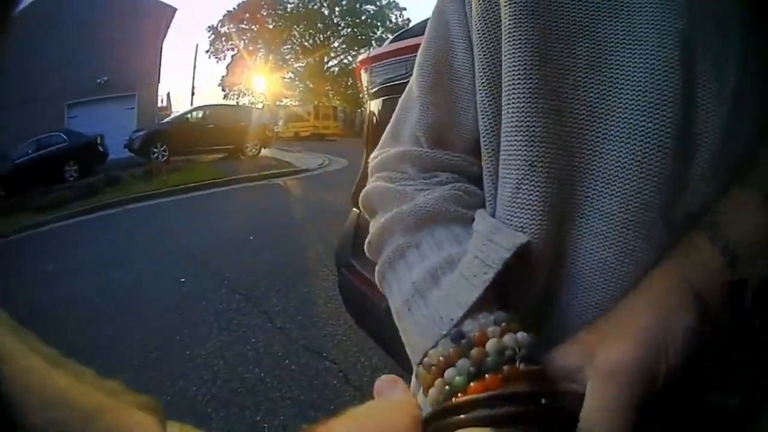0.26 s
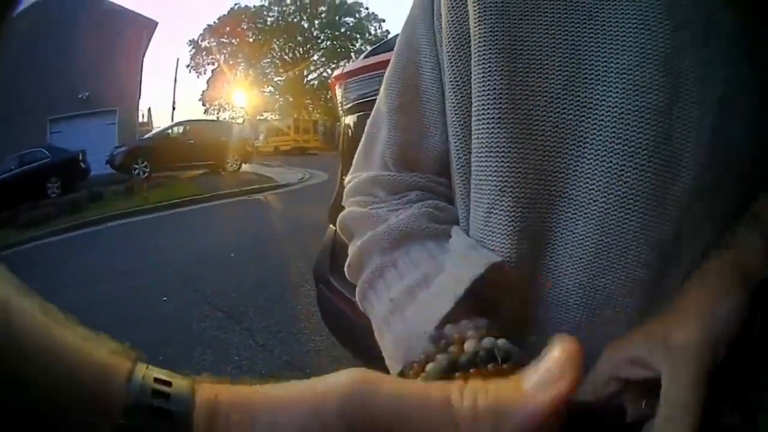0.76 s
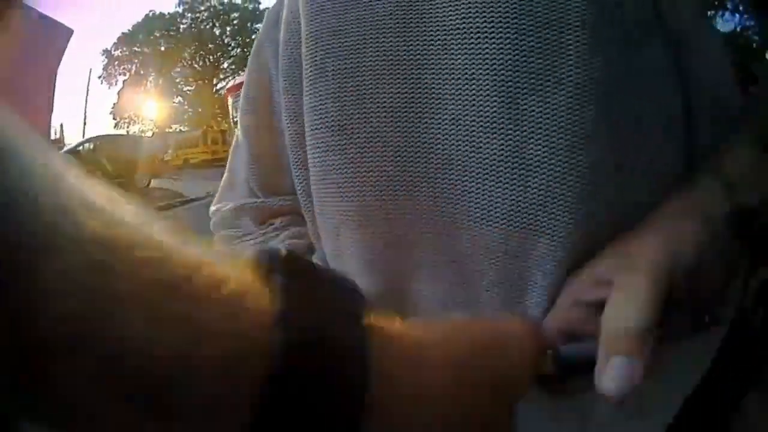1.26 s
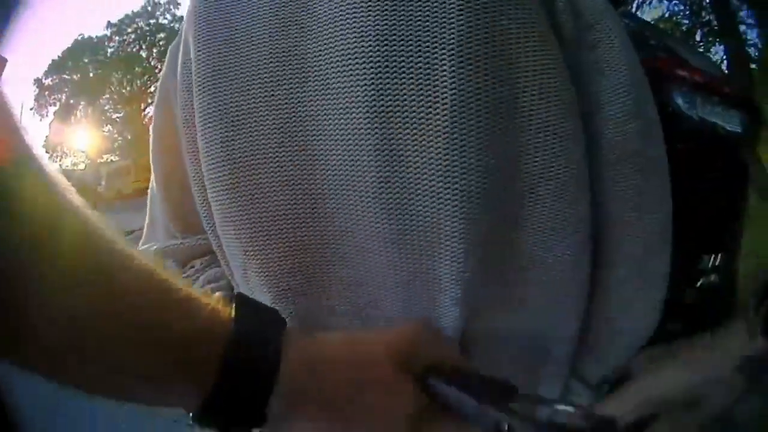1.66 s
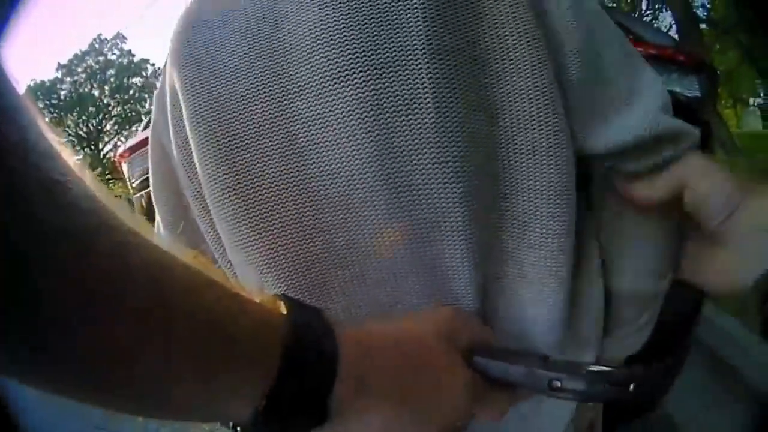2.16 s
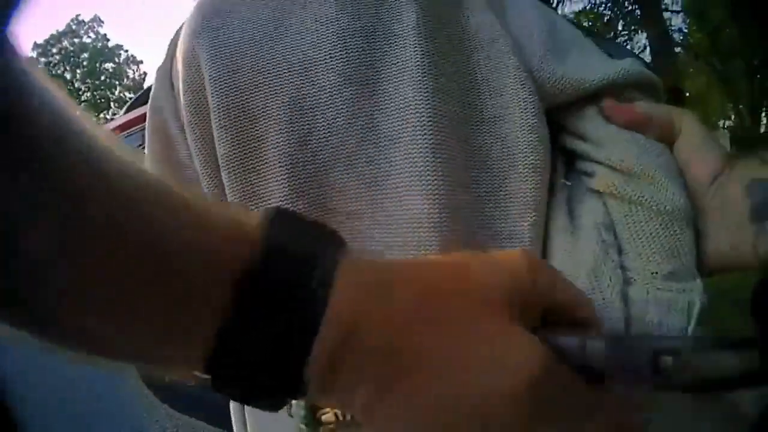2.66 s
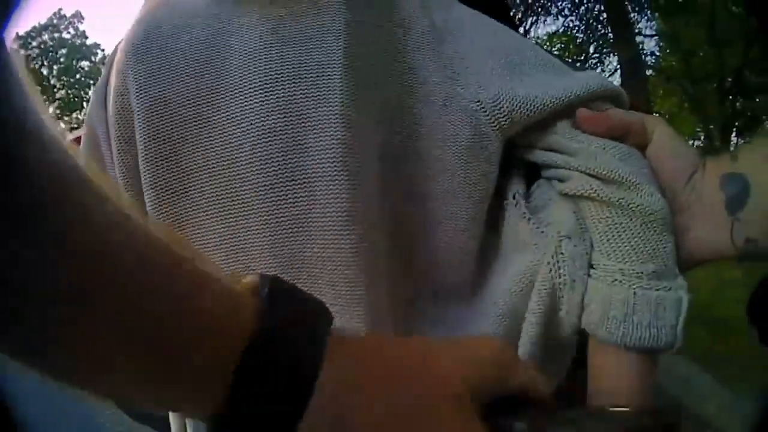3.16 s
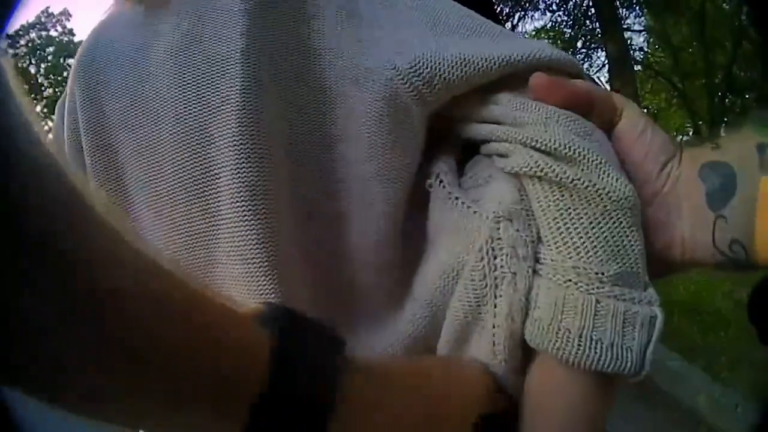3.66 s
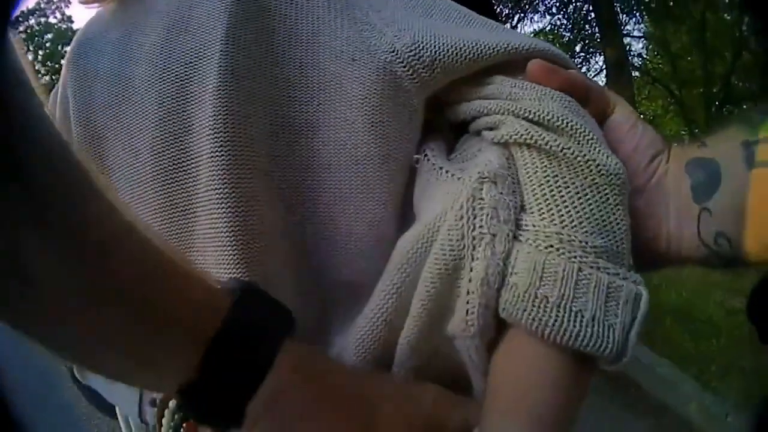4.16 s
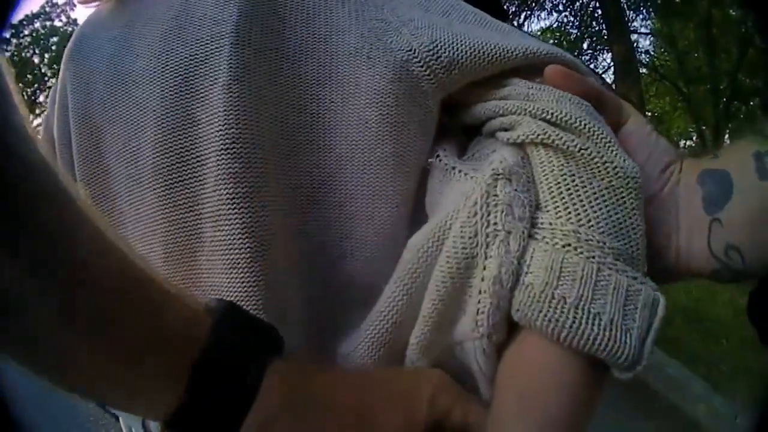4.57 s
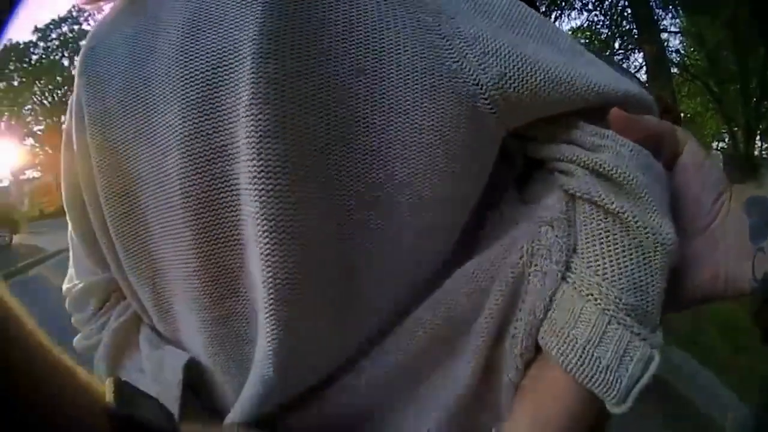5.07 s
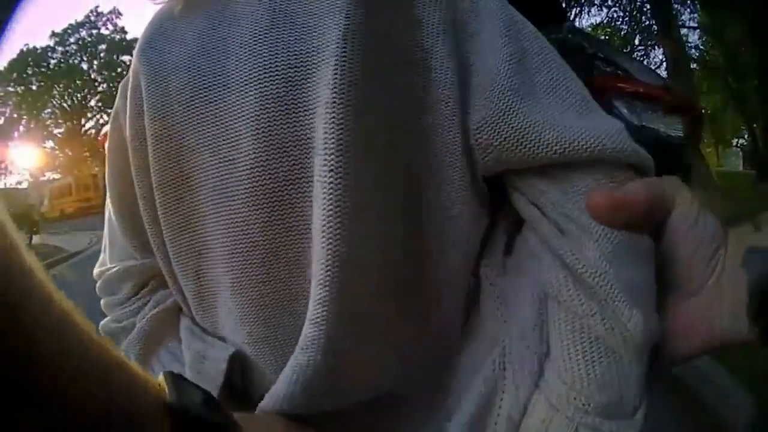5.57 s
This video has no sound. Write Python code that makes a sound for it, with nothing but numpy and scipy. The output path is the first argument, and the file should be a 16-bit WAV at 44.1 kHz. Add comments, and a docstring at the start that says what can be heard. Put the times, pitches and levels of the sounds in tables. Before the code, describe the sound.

Very close, dry body-camera sound outdoors: soft cloth friction, a hollow bump, then crisp steel handcuff teeth snapping in rapid bursts. Two strong clinks follow the last burst, and a heavy clack lands about a second later. Loud steel pushes the murmuring street down and it swells back, with a low drone passing and thin bird chirps near the end.

```python
"""Faint clinks and cloth rustle open a quiet street of murmuring traffic (shaped noise) and shrilling insects
(resonated noise); at 1.4 s a forearm bumps a chest-worn camera, whose case booms in a few modes.
From 2.1 to 3 s steel handcuffs ratchet shut in quick runs: each snap is a contact force ringing steel modes.
Single clinks and dull knocks follow, a hard one at 4.1 s; a gliding sine drone peaks near 4.7 s and a small
bird ticks in falling whistles from 5 s. A limiter makes the street sink at loud sounds and swell back."""
import sys
import numpy as np
from scipy import signal
from scipy.fft import rfft, irfft, next_fast_len
from scipy.io import wavfile
from scipy.ndimage import uniform_filter1d, minimum_filter1d

SR = 44100
rng = np.random.default_rng(int(sys.argv[2]) if len(sys.argv) > 2 else 0)


def dump(signal):
    """Clip the signal to [-1, 1] and save it as 16-bit WAV at the path in sys.argv[1]."""
    limited = np.clip(np.atleast_2d(signal).T, -1, 1)
    pcm = np.round(limited * 32767).astype(np.int16)
    wavfile.write(sys.argv[1], SR, pcm)


N = 256431
TIME = np.arange(N) / SR

# resonances of the steel cuff, the wide ones making the crack: f/Hz, width/Hz, relative level/dB
CUFF_MODES = [(1210, 300, -16), (2160, 160, -12.5), (2846, 150, -10), (3530, 340, 4), (4207, 170, -1),
              (4630, 253, 6.5), (5230, 170, -0.5), (6000, 150, -7), (7270, 900, -4.5), (9520, 290, -5.5),
              (11720, 750, 4), (11370, 1500, -1), (13600, 1350, 0), (17000, 360, 0.5)]
CREEP_S, CHATTER_S = 0.0004, 0.0017  # steel contact: build-up before the snap, chatter after it


def from_db(db):
    """Level to amplitude: 20 dB is a factor of ten."""
    return 10 ** (np.asarray(db) / 20)


def rms_one(x):
    """Normalise the mean power to one."""
    return x / np.sqrt(np.mean(x ** 2) + 1e-20)


def unit_blow(x):
    """Normalise a transient by energy, to that of 4 ms at unit rms."""
    return x / np.sqrt(np.sum(x ** 2) / (0.004 * SR) + 1e-20)


def drift(rate_hz):
    """Low-pass noise: two equal real poles leave a slow random wander of unit rms."""
    step = 40  # samples between computed points
    pole = np.exp(-2 * np.pi * rate_hz * step / SR)
    settle = 2000
    noise = rng.standard_normal(N // step + settle + 2)
    slow = signal.lfilter([1], [1, -2 * pole, pole * pole], noise)[settle:]
    return np.interp(np.arange(N) / step, np.arange(len(slow)), rms_one(slow))


def colour(x, spectrum):
    """Spectral shaping: weight each frequency, level straight over log frequency; unit rms."""
    size = next_fast_len(N)
    hz, level_db = np.transpose(spectrum)
    bins = np.maximum(np.fft.rfftfreq(size, 1 / SR), 1)
    gain = from_db(np.interp(np.log(bins), np.log(hz), level_db))
    return rms_one(irfft(rfft(x, size) * gain, size)[:N])


def resonate(x, hz, width_hz):
    """Damped oscillator: a two-pole resonance with gain near 1 at its peak."""
    r = np.exp(-np.pi * width_hz / SR)
    feed = np.array([1, 0, -1]) * (1 - r * r) / 2
    return signal.lfilter(feed, [1, -2 * r * np.cos(2 * np.pi * hz / SR), r * r], x)


def add(out, s, sound):
    """Linear superposition: mix a sound in at a time."""
    at = min(max(round(s * SR), 0), N)
    out[at:at + len(sound)] += sound[:N - at]


def blows(events, modes, snap, creep_s, chatter_s, tail_db, tail_s, detune, uneven_db):
    """Modal impact: creep, a snap, brief chatter and a fading tail excite modes; grip shifts the middle ones."""
    group_edges_hz = [3900, 8500]  # borders between low, middle and high modes: f/Hz
    nominal_ring_hz = 4650  # an event's ring at this pitch leaves the middle modes unshifted
    lead = 100  # samples of creep ahead of the snap
    out = np.zeros(N)
    t = (np.arange(SR // 8) - lead) / SR
    creep = np.exp(-abs(t) / creep_s)
    chatter = np.exp(-(t / chatter_s) ** 2)
    tail = from_db(tail_db) * np.exp(-abs(t) / tail_s)
    contact = np.where(t < 0, creep, chatter + tail)
    for s, level_db, low_db, high_db, ring_hz in events:
        groups = np.zeros((3, len(t)))
        chances = rng.standard_normal((len(modes), 2))
        for k, ((hz, width_hz, mode_db), (shift, strength)) in enumerate(zip(modes, chances)):
            force = contact * rng.standard_normal(len(t))  # the chatter reaches every mode differently
            force[lead] += snap
            group = np.searchsorted(group_edges_hz, hz)
            grip = ring_hz / nominal_ring_hz if group == 1 else 1
            ring = unit_blow(resonate(force, hz * grip * (1 + detune * shift), width_hz))
            groups[group] += (-1) ** k * from_db(mode_db + uneven_db * strength) * ring
        low, middle, high = map(unit_blow, groups)
        blow = unit_blow(from_db(low_db) * low + middle + from_db(high_db) * high)
        add(out, s - lead / SR, from_db(level_db) * blow)
    return out


def insects(swing_db):
    """Narrow-band noise: twice-resonated noise shrills far off, each band's level wandering slowly."""
    bands = [(2750, 260, -67.5), (3436, 260, -65)]  # evening shrilling: f/Hz, width/Hz of each resonance, mean level/dB
    out = np.zeros(N)
    for hz, width_hz, level_db in bands:
        shrill = resonate(resonate(rng.standard_normal(N), hz, width_hz), hz, width_hz)
        out += from_db(level_db + swing_db * drift(4)) * rms_one(shrill)
    return out


def traffic():
    """Broadband noise with a level curve: far traffic murmurs and swells as a vehicle goes by."""
    level_curve = [(0, -50), (0.13, -45), (0.35, -48.5), (1.7, -46.5), (2.6, -50.5), (3.1, -49.5),
                   (3.4, -44.5), (3.95, -46), (4.6, -36), (4.82, -43.5), (5.1, -42), (5.42, -46),
                   (5.6, -42), (5.8, -44)]  # street level joined by straight lines: t/s, level/dB
    murmur_spectrum = [(40, -8), (100, -8.5), (160, -3), (225, -0.5), (335, -9), (450, -6), (640, -12.5),
                       (850, -10.5), (1050, -16.5), (1250, -14), (1700, -23.5), (4000, -38.5)]  # relative spectrum: f/Hz, level/dB per Hz
    s, level_db = np.transpose(level_curve)
    murmur = colour(rng.standard_normal(N), murmur_spectrum)
    return from_db(np.interp(TIME, s, level_db)) * murmur


def drone():
    """Frequency modulation: a wavering two-partial tone sinks in pitch, as of a far engine slowing down."""
    peak_s, peak_hz, peak_db = 4.68, 233.5, -37.5  # pitch and level before the random waver
    sag_octaves_per_s, rise_db_per_s, fade_db_per_s = 0.49, 48, 22.5
    t = TIME - peak_s
    hz = peak_hz * 2 ** (-sag_octaves_per_s * t)
    level_db = peak_db + np.minimum(rise_db_per_s * t, -fade_db_per_s * t)
    phase = 2 * np.pi * np.cumsum(hz * (1 + 0.055 * drift(27))) / SR
    waver = from_db(3.5 * drift(16))
    tone = np.sin(phase) + from_db(-10.5) * np.sin(2 * phase)
    return from_db(level_db) * waver * tone


def bird(length_s, top_hz, bottom_hz, count):
    """Exponential chirp: each evenly paced tick is a thin whistle that drops quickly."""
    start_s, gap_s, peak_db = 5.052, 0.1745, -46.5
    out = np.zeros(N)
    u = np.linspace(0, 1, int(length_s * SR))
    hz = top_hz * (bottom_hz / top_hz) ** u
    whistle = np.sin(2 * np.pi * np.cumsum(hz) / SR) * np.sin(np.pi * u)
    for k in range(count):
        add(out, start_s + k * gap_s, from_db(peak_db) * whistle)
    return out


def rubbing():
    """Power addition: strokes swell, hold and die over the resting rustle; sleeve and fibre levels in dB."""
    # arm strokes against knitwear, before the cloth gains: t/s, length/s, sleeve level/dB, fibre level/dB
    strokes = [(0.01, 0.13, -50.5, -50.5), (0.585, 0.19, -59.5, -54.5), (1.378, 0.04, -48, -52),
               (1.736, 0.05, -60, -54), (2.193, 0.11, -59.5, -49.5), (3.353, 0.06, -48.5, -61.5),
               (3.591, 0.04, -49, -42.5), (3.699, 0.12, -56, -52.5), (3.922, 0.27, -56.5, -59),
               (4.439, 0.16, -49.5, -53.5), (4.695, 0.086, -67, -45.5), (4.899, 0.09, -48.5, -55),
               (5.565, 0.11, -52, -79), (5.69, 0.11, -47, -58.5)]
    attack_s, release_s = 0.025, 0.06
    sleeve, fibres = from_db(-57) ** 2, from_db(-65) ** 2  # the cloth never lies quite still
    for s, length_s, sleeve_db, fibre_db in strokes:
        before = np.maximum(s - TIME, 0)
        after = np.maximum(TIME - s - length_s, 0)
        stroke = np.exp(-before / attack_s - after / release_s)
        sleeve = sleeve + (from_db(sleeve_db) * stroke) ** 2
        fibres = fibres + (from_db(fibre_db) * stroke) ** 2
    return 10 * np.log10(sleeve), 10 * np.log10(fibres)


def friction(level_db, spectrum, grains_per_s, size_spread, grain_share, grain_growth, patchy_db):
    """Stick-slip: threads catch in grains over a hiss, more under pressure; folds favour changing bands."""
    sizes = np.exp(np.clip(size_spread, 0, 1) * rng.standard_normal(N)) * rng.choice([-1, 1], N)
    grains = rms_one(sizes * (rng.random(N) < grains_per_s / SR))
    share = grain_share * from_db(grain_growth * (level_db - level_db.max()))
    hiss = rng.standard_normal((2, N))
    rub = (hiss + share * grains) / np.sqrt(1 + share ** 2)
    edges_hz = np.geomspace(600, 17000, 37)
    folds = np.zeros(N)
    for k, band_hz in enumerate(zip(edges_hz, edges_hz[1:])):
        band_filter = signal.butter(2, band_hz, "band", fs=SR, output="sos")
        folds += signal.sosfilt(band_filter, rub[k % 2]) * from_db(patchy_db * drift(18.4))
    return from_db(level_db) * colour(folds, spectrum)


def clothes(sleeve_db, fibre_db):
    """Dry friction: knitted sleeves rub softly and crackle where they drag over skin and steel."""
    # relative spectra of the soft rub and the crisp fibres: f/Hz, level/dB per Hz
    sleeve_spectrum = [(600, -24), (1400, -11), (1900, 1), (2350, 1.5), (2750, 2.5), (3150, 4), (3430, 3.5),
                       (3720, -1), (4500, 5.5), (5800, -6.5), (7500, -31)]
    fibre_spectrum = [(1500, -12.5), (3500, -9.5), (4300, 7.5), (4950, 9.5), (5700, 5), (6800, -0.5),
                      (8500, -4), (11500, -8), (15000, -0.5), (17000, -46)]
    sleeve = friction(sleeve_db, sleeve_spectrum, grains_per_s=200, size_spread=0.39,
                      grain_share=0.94, grain_growth=0.74, patchy_db=3.0)
    fibres = friction(fibre_db, fibre_spectrum, grains_per_s=250, size_spread=0.38,
                      grain_share=3.3, grain_growth=0.66, patchy_db=4.0)
    return from_db(0.28) * sleeve + from_db(4.5) * fibres


def bump():
    """Impulse response: soft blows of a forearm make the camera case boom briefly in its modes."""
    blow_levels = [(1.363, -34), (1.372, -32.5), (1.379, -30), (1.4, -35)]  # forearm blows: t/s, level/dB
    case_modes = [(156, 48, -16), (264, 56, 3), (536, 390, 0.5), (966, 18, -7)]  # resonances of the case: f/Hz, width/Hz, relative level/dB
    force = np.zeros(SR // 8)
    force[0] = 1
    boom = np.zeros(len(force))
    for hz, width_hz, mode_db in case_modes:
        boom += from_db(mode_db) * unit_blow(resonate(force, hz, width_hz))
    boom = unit_blow(boom)
    out = np.zeros(N)
    for s, level_db in blow_levels:
        add(out, s, from_db(level_db) * boom)
    return out


def gear_knocks():
    """Modal impact with heavy damping: hands, cuffs and gear knock dully."""
    knock_list = [(1.1595, -39.5, -2), (1.3532, -24, 3.5), (1.402, -32.5, -3), (1.9611, -31, -2),
                  (2.0852, -14.5, -0.5), (2.786, -13.5, 4.5), (4.0996, -24.5, -1), (4.1064, -9.5, 10),
                  (4.338, -38, 5.5), (4.7061, -35, 2), (5.3262, -37.5, 2.5), (5.5499, -33, 14),
                  (5.641, -40, 21), (5.7284, -32.5, -1)]  # dull knocks: t/s, level/dB, low over middle modes/dB
    gear_modes = [(331, 270, -8), (1070, 670, -9), (1683, 180, -6), (2144, 480, -5), (2797, 350, -4.5),
                  (3120, 540, 0.5), (4730, 720, -1), (5640, 670, -2.5), (10380, 1300, -7),
                  (14260, 3000, -6)]  # resonances of the gear: f/Hz, width/Hz, relative level/dB
    high_db, ring_hz = -27, 4750  # high over middle modes, ring that shifts the middle modes
    events = [(s, level_db, low_db, high_db, ring_hz) for s, level_db, low_db in knock_list]
    return blows(events, gear_modes, snap=28, creep_s=CREEP_S, chatter_s=0.0026,
                 tail_db=-2.5, tail_s=0.0054, detune=0.055, uneven_db=2.5)


def chain_ticks(fibre_db):
    """Level-driven random arrivals: links touch more often and harder the more the cloth drags."""
    most_per_s = 55  # mean rate at the hardest rub
    over_db, spread_db = 5.5, 9  # least level over the fibre curve, further random range
    low_db, high_db, ring_hz = -14, -9, 4960  # mode groups over the middle one, ring
    due = np.cumsum(most_per_s * from_db(fibre_db - fibre_db.max())) / SR
    chance = rng.random((120, 2))  # one arrival per unit of due, at most 120
    at = np.searchsorted(due, np.arange(len(chance)) + chance[:, 0])
    return [(i / SR, fibre_db[i] + over_db + spread_db * size ** 2, low_db, high_db, ring_hz)
            for i, size in zip(at, chance[:, 1]) if i < N]


def loose_steel(fibre_db):
    """Modal impact: bow, lock and chain clink singly, and the chain ticks as cloth drags over it."""
    # levels before the bass cut: t/s, level/dB, low over middle modes/dB, high over middle modes/dB, ring f/Hz
    clinks = [(0.038, -40, -19, -20, 5530), (0.07, -41, -2, -12, 5150), (1.038, -45.5, -12, -5, 5130),
              (1.4872, -37, -9, -9, 5030), (2.0582, -40.5, -21, -12, 4750), (2.2258, -28, 2, -13, 4560),
              (2.3718, -24, -1, -19, 4670), (2.4974, -24, -14, -35, 4660), (2.6255, -34.5, -14, -3, 5100),
              (3.0401, 4, -9, -8.5, 4920), (3.1646, -4, -10, -15, 4940), (3.334, -19.5, -4.5, -14, 4650),
              (3.5715, -38.5, -21, 5, 5100), (3.607, -27.5, -26, -11, 5100), (3.716, -29, -9, -18.5, 4750),
              (4.1065, 2.5, -28, -16.5, 4390), (4.3788, -40.5, -13, -24, 4350),
              (4.4329, -33, -8, -12, 4780), (4.7172, -29, -22, -7, 4430), (4.7994, -34, -25.5, -1.5, 5240)]
    return blows(clinks + chain_ticks(fibre_db), CUFF_MODES, snap=8.5, creep_s=CREEP_S, chatter_s=CHATTER_S,
                 tail_db=-31, tail_s=0.0054, detune=0.027, uneven_db=1.0)


def slide(snaps, longest_gap_s, below_db):
    """Sliding friction: in a quick run the pawl scrapes up the back of each tooth until the next snap."""
    pressure = np.zeros(N)
    for (s, level_db, *_), (next_s, *_) in zip(snaps, snaps[1:]):
        if next_s - s < longest_gap_s:
            pressure[round(s * SR):round(next_s * SR)] = from_db(level_db + below_db)
    steel = np.zeros(N)
    for hz, width_hz, mode_db in CUFF_MODES:
        ring = resonate(rng.standard_normal(N), hz, 2 * width_hz)  # contact doubles the damping
        steel += from_db(mode_db) * rms_one(ring)
    return pressure * rms_one(steel)


def teeth():
    """Kinematics of the pawl: gaps between snaps change evenly along a push, as do level and brightness."""
    # pushes on the bow, levels before sag and chance: first snap t/s, last snap t/s, teeth,
    # first over last gap, first level/dB, last level/dB, first and last high over middle modes/dB
    pushes = [(2.0847, 2.159, 6, 3.57, 2, -0.5, 1.5, -11), (2.3267, 2.3447, 5, 1.56, -9, -3.5, -10, -4),
              (2.7846, 2.884, 11, 2.05, -3, 1.5, -7.5, 3), (2.894, 2.921, 3, 1.76, 1, 3.5, 1, 1.5),
              (2.9414, 2.9878, 3, 0.99, 5, 1.5, 2, -1.5)]
    ring_hz, ring_spread = 4660, 0.0097  # mean ring, spread as a share of it
    low_db, low_spread_db = -9, 2  # mean of low over middle modes, spread
    uneven_db = 1.92  # level spread from tooth to tooth
    sag_db = 2.5  # mid-push weakening, where the pawl only skims the teeth
    rows = []
    for first_s, last_s, count, gap_ratio, first_db, last_db, first_high_db, last_high_db in pushes:
        count = round(count)
        travel = np.append(0, np.cumsum(np.linspace(gap_ratio, 1, count - 1)))
        times = first_s + (last_s - first_s) * travel / travel[-1]
        strength, body, grip = rng.standard_normal((count, 3)).T
        sag = sag_db * np.sin(np.linspace(0, np.pi, count)) * (count > 3)  # long pushes only
        levels = np.linspace(first_db, last_db, count) - sag + uneven_db * strength
        lows = low_db + low_spread_db * body
        highs = np.linspace(first_high_db, last_high_db, count)
        rings = ring_hz * (1 + ring_spread * grip)
        rows += zip(times, levels, lows, highs, rings)
    return rows


def ratchet(snaps):
    """Modal impact: the pawl snaps over each tooth and rings the steel cuff."""
    return blows(snaps, CUFF_MODES, snap=6.5, creep_s=CREEP_S, chatter_s=CHATTER_S,
                 tail_db=-28, tail_s=0.013, detune=0.007, uneven_db=2.0)


def thin_steel(x, lowest_hz):
    """Radiation efficiency: small steel parts radiate almost no bass, hence a high-pass."""
    return signal.sosfilt(signal.butter(2, lowest_hz, "high", fs=SR, output="sos"), x)


def scene():
    """Superposition: street, clothes and gear around the handcuffs."""
    sleeve_db, fibre_db = rubbing()
    far = insects(swing_db=3.5) + traffic() + drone()
    far += bird(length_s=0.015, top_hz=7100, bottom_hz=4350, count=5)
    near = clothes(sleeve_db, fibre_db) + bump() + gear_knocks()
    snaps = teeth()
    scrape = slide(snaps, longest_gap_s=0.017, below_db=-18)
    steel = thin_steel(loose_steel(fibre_db) + scrape + ratchet(snaps), lowest_hz=1100)
    return (far + near + steel)[None]


def limiter(x, ceiling_db, window_s, hold_s, release_db_per_s):
    """Gain control by short-time power: gain drops just ahead of a loud sound, holds, then climbs slowly."""
    power = np.maximum(uniform_filter1d(x ** 2, int(window_s * SR)), 1e-12)
    over_db = np.maximum(10 * np.log10(power) - ceiling_db, 0)
    half = int(hold_s * SR / 2)
    # the origin turns the window backward, so each excess is held afterwards
    held_db = -minimum_filter1d(-over_db, 2 * half + 1, origin=half, mode="constant")
    release_db = release_db_per_s * TIME
    cut_db = np.maximum.accumulate(held_db + release_db) - release_db
    return x * from_db(-cut_db)


def record(dry):
    """Transmission chain: the camera's limiter, its own low noise, and an elliptic low-pass."""
    floor_spectrum = [(20, -3.5), (32, 4.5), (50, -2.5), (110, -4), (220, -15), (600, -23), (2000, -34.5),
                      (16000, -56)]  # relative spectrum of the noise: f/Hz, level/dB per Hz
    cutoff_hz = 16300
    limited = limiter(dry[0], ceiling_db=-21.5, window_s=0.015, hold_s=0.07, release_db_per_s=31)
    floor = from_db(-60.0) * colour(rng.standard_normal(N), floor_spectrum)
    low_pass = signal.ellip(10, 0.3, 80, cutoff_hz, fs=SR, output="sos")
    return signal.sosfilt(low_pass, limited + floor)[None]


dry = scene()
out = record(dry)
dump(out)
```